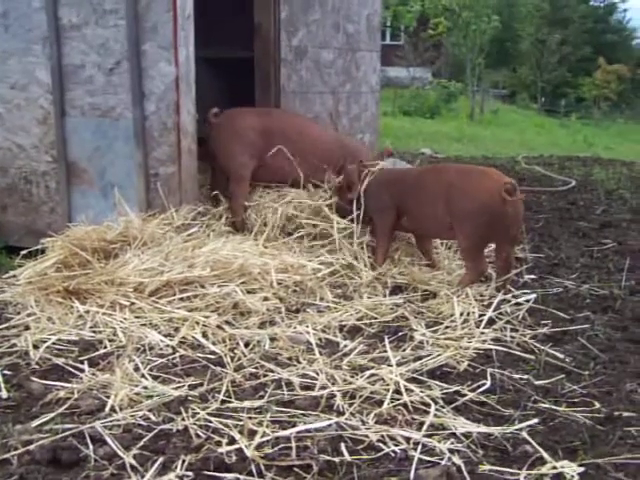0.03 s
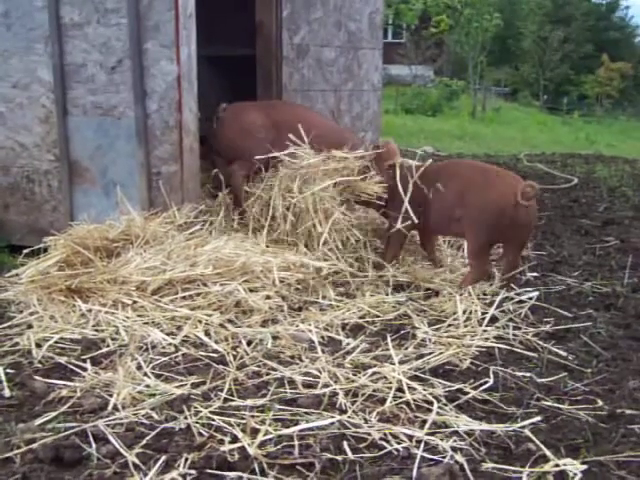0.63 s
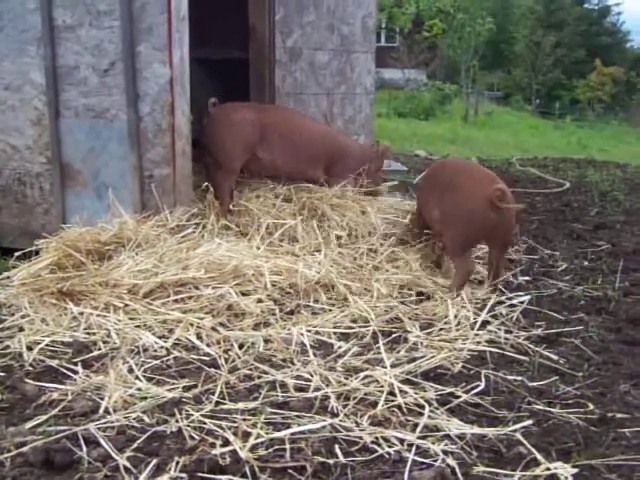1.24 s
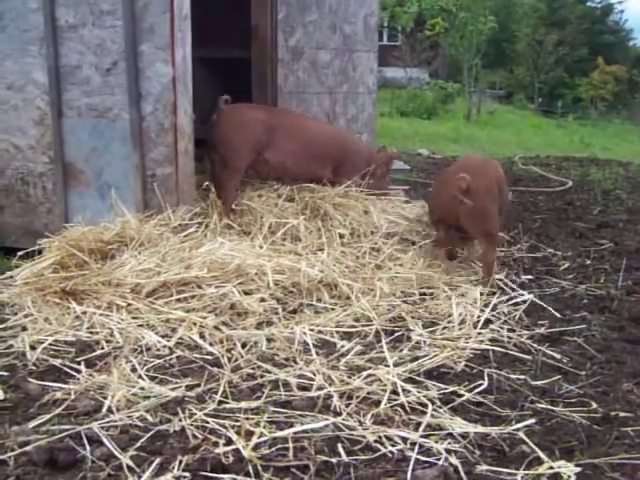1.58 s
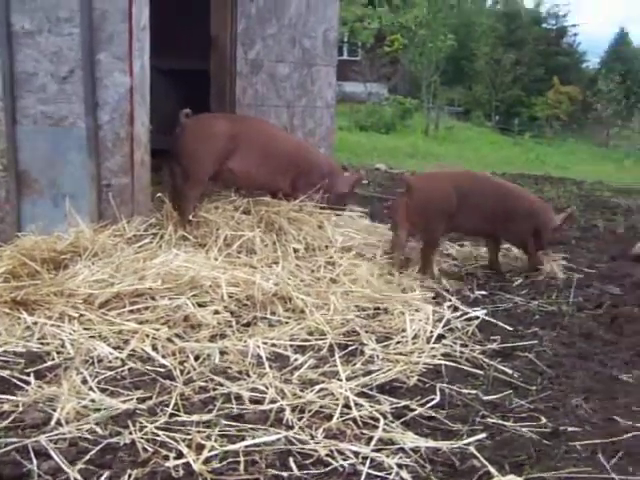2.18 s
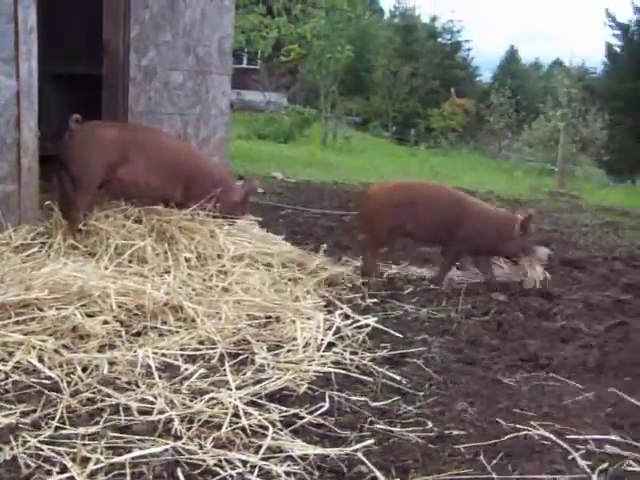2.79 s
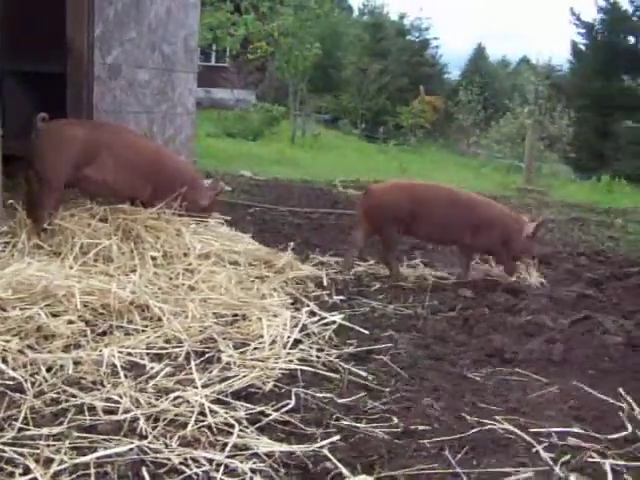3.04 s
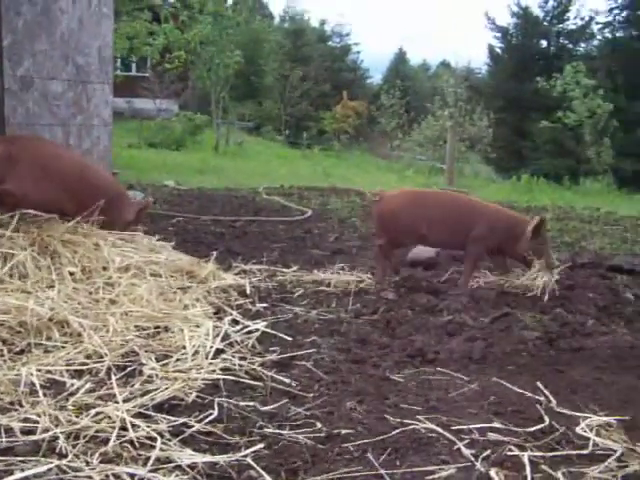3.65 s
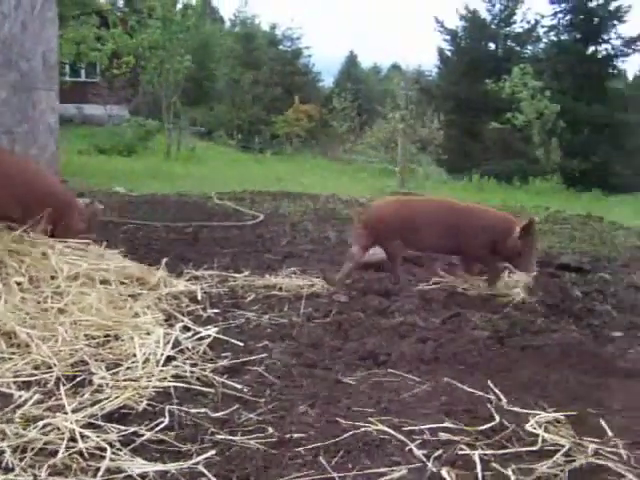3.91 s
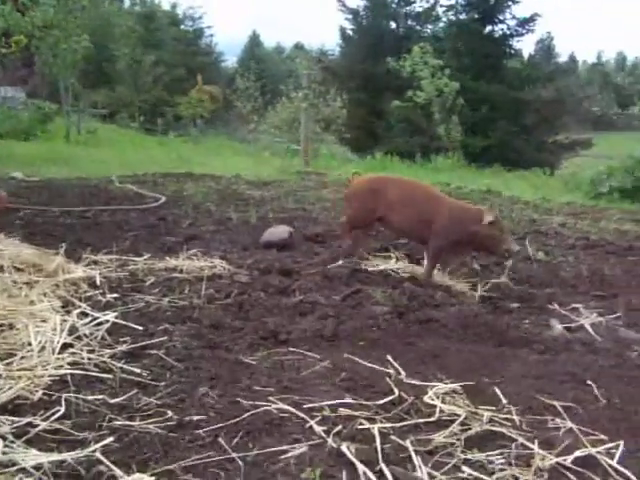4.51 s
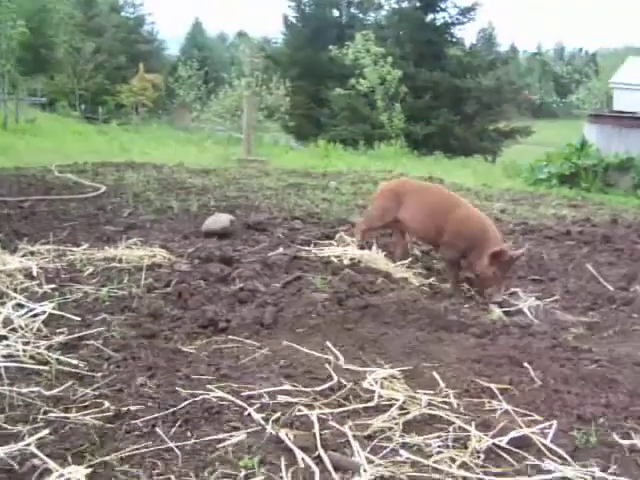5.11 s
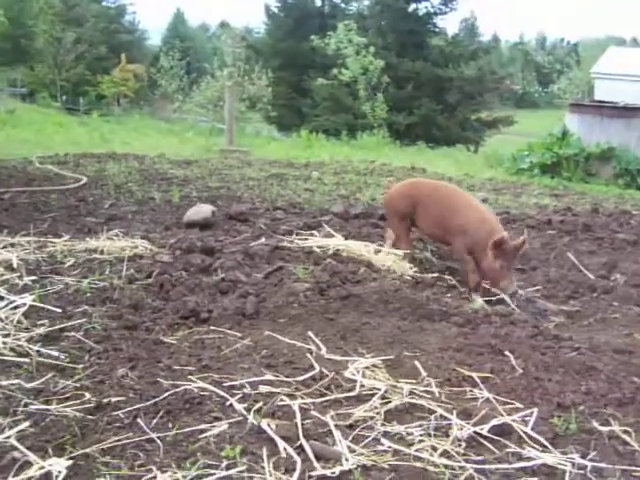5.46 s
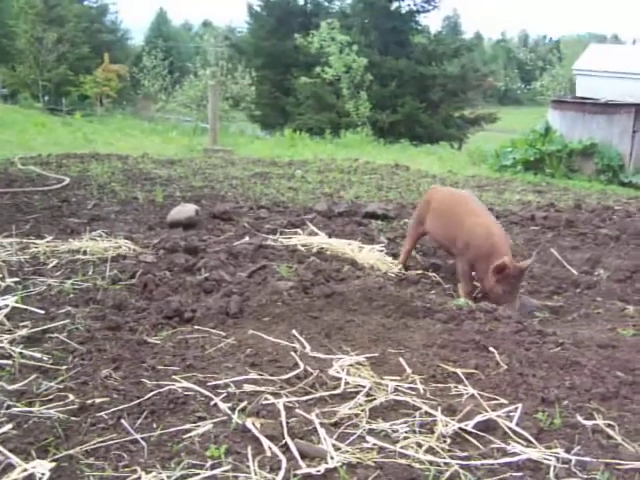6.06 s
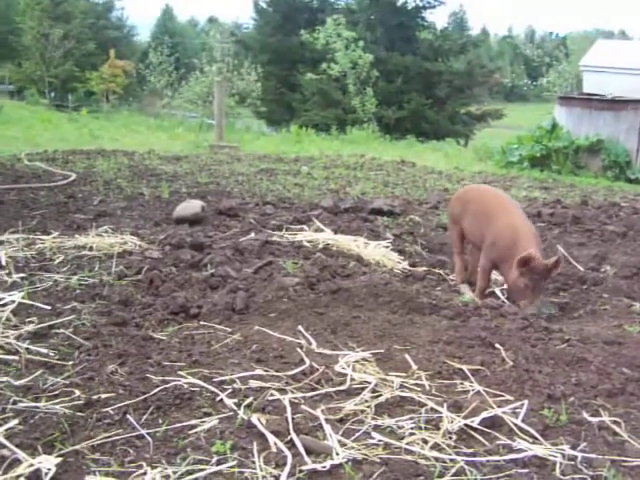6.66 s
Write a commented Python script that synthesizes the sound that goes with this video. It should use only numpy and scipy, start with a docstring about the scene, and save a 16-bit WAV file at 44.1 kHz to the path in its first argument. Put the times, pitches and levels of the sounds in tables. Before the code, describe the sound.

Crisp straw rustles in uneven bursts as young pigs shove through it, with sharp stalk cracks and quiet, breathy grunts. A swallow gives short, clear chirps overhead. About four seconds in, hooves knock on mud and clods; then the straw settles to light stirring while far birds call. A small microphone in the open farm pen also picks up steady airy hiss, a faint engine hum and its camera's slight whine.

```python
"""Two young pigs shove through dry straw in an outdoor pen; one trots off and snuffles in the soil.
The straw crackles with many tiny breaks, thick stalks snap, and hooves pat the mud. Each snuffle is
fluttering air that rings in the nose and mouth. A swallow whistles overhead and other birds call from
the trees. Behind it all are a soft hiss of open air, a far idling engine and a camera's faint whine,
and once a low drone swells and fades."""
import sys
import numpy as np
from scipy import signal
from scipy.fft import rfft, irfft, next_fast_len
from scipy.io import wavfile
from scipy.ndimage import uniform_filter1d

SR = 44100
rng = np.random.default_rng(int(sys.argv[2]) if len(sys.argv) > 2 else 0)


def inscribe(sig):
    """Save sig as 16-bit PCM at rate SR to the path in sys.argv[1].

    A 1-D sig is mono; a 2-D sig holds one channel per row.
    Samples are clipped to [-1, 1] before scaling.
    """
    pcm = np.round(np.clip(np.atleast_2d(sig).T, -1, 1) * 32767)
    wavfile.write(sys.argv[1], SR, pcm.astype(np.int16))


N = 299439
TIME = np.arange(N) / SR


def from_db(db):
    """Turn decibels into a number to multiply a sound by."""
    return 10 ** (np.asarray(db) / 20)


def unit_power(x):
    """Scale a sound so that its average power is 1."""
    return x / np.sqrt(np.mean(x ** 2) + 1e-20)


def curves(rows):
    """Join timed rows with straight lines: one curve for each column after the time."""
    times, *columns = np.transpose(rows)
    return [np.interp(TIME, times, column) for column in columns]


def drift(rate):
    """A smooth random wobble about 1 in size; a higher rate wobbles faster."""
    r = np.exp(-40 * np.pi * rate / SR)
    slow = signal.lfilter([1], [1, -2 * r, r * r], rng.standard_normal(N // 20 + 2002))[2000:]
    return np.interp(np.arange(N) / 20, np.arange(len(slow)), unit_power(slow))


def colour(x, spectrum):
    """Make some frequencies stronger and others weaker, then set the power to 1."""
    hz, db = np.transpose(spectrum)
    size = next_fast_len(N)
    bins = np.maximum(np.fft.rfftfreq(size, 1 / SR), 1)
    gains = from_db(np.interp(np.log(bins), np.log(hz), db))
    return unit_power(irfft(rfft(x, size) * gains, size)[:N])


def ring(x, hz, width):
    """Let a sound ring around one frequency; filtering twice cuts the rest away steeply."""
    r = np.exp(-np.pi * width / SR)
    forward = np.array([1, 0, -1]) * (1 - r * r) / 2
    feedback = [1, -2 * r * np.cos(2 * np.pi * hz / SR), r * r]
    return signal.lfilter(forward, feedback, signal.lfilter(forward, feedback, x))


def band(x, hz, width):
    """The part of a sound around one frequency, with its power set to 1."""
    return unit_power(ring(x, hz, width))


def tone(hz):
    """A pure tone of power 1 that follows a pitch curve."""
    return np.sqrt(2) * np.sin(2 * np.pi * np.cumsum(hz) / SR)


def swell(start, length, skew):
    """A rounded rise and fall; a skew under 1 makes the top come earlier."""
    out = np.zeros(N)
    inside = (TIME > start) & (TIME < start + length)
    out[inside] = np.sin(np.pi * ((TIME[inside] - start) / length) ** skew)
    return out ** 0.46


def add(track, start, sound):
    """Mix a short sound into a track, with its start in seconds."""
    at = int(start * SR)
    track[at:at + len(sound)] += sound[:max(N - at, 0)]


def shove(top, length, rise_share=0.35, edge_db=-10.5):
    """The strength of one shove: the straw is pressed ever harder, then settles more slowly."""
    building = np.maximum(top - TIME, 0) / (rise_share * length)
    settling = np.maximum(TIME - top, 0) / ((1 - rise_share) * length)
    near = (building < 3) & (settling < 4)
    out = np.zeros(N)
    out[near] = from_db(edge_db * (building[near] ** 2 + settling[near] ** 1.4))
    return out


# A snout or leg shoves through the straw. Each row: time of the hardest push in seconds,
# level in dB, length in seconds, extra level for thick stalks in dB.
STRAW_SHOVES = [(0.02, -32, 0.4, 5.5), (0.197, -28, 0.084, 0.5), (0.441, -22.5, 0.23, 2),
                (0.658, -19.5, 0.27, -0.5), (0.885, -20, 0.39, 0), (1.087, -25.5, 0.15, 1),
                (1.252, -27, 0.2, -0.5), (1.669, -29, 0.15, 0.5), (1.8, -24.5, .27, -2.5),
                (2.056, -28, 0.2, -5.5), (2.337, -31, 0.051, -2), (2.481, -26.5, .28, -6),
                (2.814, -33, 0.085, -16), (2.925, -29.5, 0.15, -2), (3.36, -30, 0.18, 1),
                (3.527, -32.5, 0.27, 2), (3.702, -32.5, 0.14, -1), (3.825, -32.5, .16, 4),
                (4.066, -32.5, 0.37, -2), (4.245, -33, 0.11, 3), (4.615, -29.5, .32, 3.5),
                (5.108, -41, 0.24, 5), (5.379, -34, 0.16, -1), (5.558, -37.5, 0.048, 0),
                (5.844, -48.5, 0.42, 6), (6.1, -50.5, .2, 12), (6.319, -41.5, 0.25, 2),
                (6.761, -39, 0.53, 0.5)]
# Straw stirred underfoot between shoves. Each row: time in seconds, level in dB, an unused number.
STRAW_STIRRING = [(0, -37, 4), (1.3, -34.5, -3), (1.52, -36.5, -4), (2.15, -35.5, 3), (3.0, -37.5, 7),
                  (3.15, -39.5, 0), (3.4, -36.5, -1), (4.45, -36.5, 3), (4.9, -43.5, 5), (5.24, -49.5, 6),
                  (5.45, -45.5, 5), (6.0, -45, 8), (6.22, -59, 8), (6.79, -63, -5)]


def straw_movement(stirring_thick_db=2):
    """Stirring and shoves add up to set how loud the thin and the thick stalks are."""
    thin_power = from_db(curves(STRAW_STIRRING)[0]) ** 2
    thick_power = thin_power * from_db(stirring_thick_db) ** 2
    for top, db, length, thick_db in STRAW_SHOVES:
        power = (from_db(db) * shove(top, length)) ** 2
        thin_power += power
        thick_power += power * from_db(thick_db) ** 2
    return np.sqrt(thin_power), np.sqrt(thick_power)


def crackles(per_second, spread_db=1.5):
    """Tiny breaks click at random moments, a few louder than the rest."""
    sizes = from_db(spread_db * np.minimum(rng.exponential(1, N), 5))
    signs = rng.choice([-1, 1], N)
    breaking = rng.random(N) < per_second / SR
    return unit_power(sizes * signs * breaking / np.sqrt(per_second))


# The bright tone of dry straw. Each row: frequency in Hz, relative strength in dB.
STRAW_SPECTRUM = [(120, -39.5), (320, -19.5), (520, -32.5), (750, -19.5), (1050, -19), (1280, -21.5),
                  (1600, -16), (2050, -17), (2500, -8), (3300, -6), (4400, -1), (5500, -0.5), (6400, 0),
                  (7100, -3), (8000, -8), (9000, -20.5)]


def straw(thick_below_hz=4830):
    """Stalks rub and crack in clumps; harder shoving breaks more, and thick stalks sound lower."""
    thin_gain, thick_gain = straw_movement()
    breaks_per_second = 4000 * (thin_gain / from_db(-34)) ** 0.6
    fine = crackles(breaks_per_second) + 0.5 * rng.standard_normal(N)
    stiff_stalks = from_db(-12) * crackles(0.014 * breaks_per_second)
    clumps = from_db(0.89 * drift(25.6))
    rustle = colour((fine + stiff_stalks) * clumps, STRAW_SPECTRUM)
    keep_highs = signal.butter(2, thick_below_hz, "high", fs=SR, output="sos")
    thin = signal.sosfiltfilt(keep_highs, rustle)
    thick = rustle - thin
    return thin_gain * thin + thick_gain * thick


# Snuffling grunts. Each row: start in seconds, length in seconds, level in dB,
# ring of the nose in Hz, extra level for the mouth in dB (higher is more open).
PIG_SNUFFLES = [(0, 0.13, -50, 352, 7), (0.34, 0.19, -52, 326, -16), (1.056, 0.28, -49.5, 338, 0.5),
                (1.597, 0.34, -45, 323, 4), (2.451, 0.27, -46.5, 330, 4.5), (3.264, 0.28, -51, 313, 1.5),
                (3.8, 0.17, -50, 350, 1), (4.505, 0.36, -42, 302, -0.5), (4.872, 0.32, -53.5, 314, -1),
                (5.73, 0.061, -49.5, 340, 1), (6.254, 0.19, -42, 300, 0)]
# Where the mouth rings. Each row: frequency in Hz, width in Hz, relative level in dB.
MOUTH_RINGS = [(755, 376, -5), (1020, 310, -14.5)]


def snuffles():
    """Uneven flaps in a pig's snout chop the air, which rings in the nose and the half-open mouth."""
    flap_hz = 42 * from_db(2 * drift(17.8))
    breath = from_db(0.56 * tone(flap_hz)) * rng.standard_normal(N)
    nose, mouth_gain = np.zeros(N), np.zeros(N)
    for start, length, db, nose_hz, open_db in PIG_SNUFFLES:
        push = from_db(db) * swell(start, length, skew=0.5)
        nose += push * band(breath, nose_hz, width=177)
        mouth_gain += push * from_db(open_db)
    mouth = sum(from_db(db) * band(breath, hz, width) for hz, width, db in MOUTH_RINGS)
    return nose + mouth_gain * mouth


# The tone of the open air. Each row: frequency in Hz, relative strength in dB.
AIR_SPECTRUM = [(35, -45), (60, -1.5), (125, 1), (508, -5), (710, -7.5), (789, -5), (1250, -11.5),
                (1450, -10), (1860, -13), (3490, -3), (6540, -7.5), (7570, -13.5), (8950, -33),
                (11600, -73), (19700, -120)]


def open_air():
    """A soft, steady outdoor hiss."""
    return from_db(-47) * colour(rng.standard_normal(N), AIR_SPECTRUM)


# The engine's speed. Each row: time in seconds, firings per second.
ENGINE_SPEED = [(0, 50.43), (2.8, 51.23), (4.2, 49), (5.9, 48), (6.79, 49.7)]
# The tones in its hum. Each row: multiple of the firing rate, level in dB.
ENGINE_TONES = [(1, -60.5), (2, -62), (3, -66.5)]


def engine():
    """A far engine idles; its firings blend into a low, slightly unsteady hum."""
    firing_hz = curves(ENGINE_SPEED)[0] * (1 + 0.0056 * drift(2.2))
    return sum(from_db(db + 0.98 * drift(4)) * tone(k * firing_hz) for k, db in ENGINE_TONES)


# The tones in the camera's whine. Each row: pitch in Hz, level in dB.
WHINE_TONES = [(718, -62.5), (1436, -65.5)]


def camera_whine(waver_db=1.3):
    """Two faint tones that waver a little in level and pitch."""
    out = np.zeros(N)
    for hz, db in WHINE_TONES:
        gain = from_db(db + waver_db * drift(4.2))
        out += gain * tone(hz * (1 + 0.0023 * drift(12.5)))
    return out


# Hooves and snouts thump the ground.
# Each row: start in seconds, level in dB, pitch in Hz, seconds to fade by 60 dB.
GROUND_THUDS = [(0.166, -38.5, 350, 0.054), (0.732, -35.5, 275, 0.055), (.935, -38.5, 69, 0.27),
                (2.675, -43, 324, 0.11), (3.962, -30, 1137, 0.056), (4.0, -31.5, 656, 0.022),
                (4.039, -33.5, 222, 0.084), (4.104, -33.5, 790, 0.019), (5.405, -35.5, 234, 0.075),
                (5.417, -38, 850, 0.033), (5.485, -39, 1250, 0.022)]


def thuds():
    """Soft blows on mud and clods: mostly crumbling grit, with a note that dies quickly."""
    out, t = np.zeros(N), TIME[:SR // 2]
    for start, db, hz, fade_time in GROUND_THUDS:
        grit = band(rng.standard_normal(len(t)), hz, width=hz)
        note = 1.1 * np.sin(2 * np.pi * hz * t)
        rise_and_fade = (1 - np.exp(-t * hz)) * from_db(-60 * t / fade_time)
        add(out, start, from_db(db) * (grit + note) * rise_and_fade)
    return out


# Thick stalks snap. Each row: start in seconds, peak level in dB, ring in Hz.
STALK_SNAPS = [(0.734, -24, 1720), (1.2252, -16, 6040), (1.402, -16, 3700), (2.456, -12, 5200),
               (2.576, -11, 6000), (2.614, -7, 4130), (2.6237, -10.5, 3900), (2.925, -14.5, 4430),
               (3.9625, -20, 1170), (3.9628, -9, 2640), (3.964, -10, 4200), (4.367, -21, 6140),
               (5.268, -25.5, 3300), (5.6613, -21, 5940), (6.0306, -15, 5500), (6.032, -24.5, 2900),
               (6.759, -16, 5450), (6.779, -9.5, 5030)]


def snaps():
    """A stalk cracks and splinters; the ground throws the crack back about a millisecond later."""
    out, t = np.zeros(N), TIME[:1024]
    for start, db, hz in STALK_SNAPS:
        burst = 0.06 * rng.standard_normal(len(t)) * from_db(-60 * t / 0.009)  # splinters
        burst[0] += 1  # the break
        burst[int(rng.uniform(0.0006, 0.0012) * SR)] += 0.55  # its echo
        for width in (0.5 * hz, 0.58 * hz):  # two broad filters make the stalk ring
            r = np.exp(-np.pi * width / SR)
            burst = signal.lfilter([1, 0, -1], [1, -2 * r * np.cos(2 * np.pi * hz / SR), r * r], burst)
        add(out, start, from_db(db) * burst / np.abs(burst).max())
    return out


def whistle(shape, start, db, pitch=1):
    """One gliding, slightly unsteady bird note."""
    times, hz, shape_db = np.transpose(shape)
    t = TIME[:int(times[-1] * SR)]
    waver = 1 + 0.014 * unit_power(uniform_filter1d(rng.standard_normal(len(t)), size=90))
    gain = from_db(db + np.interp(t, times, shape_db))
    out = np.zeros(N)
    add(out, start, gain * tone(pitch * waver * np.interp(t, times, hz)))
    return out


# The shape of one swallow chirp. Each row: seconds into it, pitch in Hz, relative level in dB.
SWALLOW_SHAPE = [(0, 3846, -21), (.011, 5550, -4.5), (.021, 5480, -5.5), (.029, 4190, -3),
                 (.039, 3900, -9.5), (.046, 4164, 2), (.054, 3070, -22), (.073, 3600, -7), (.078, 4004, 0),
                 (.084, 4300, 1.5), (.089, 3396, -12), (.106, 3025, -21.5)]
# The swallow's chirps. Each row: start in seconds, level in dB, number to multiply the pitch by.
SWALLOW_CHIRPS = [(1.501, -24.5, 0.98), (2.385, -25, 0.96), (3.391, -23.5, 1.01), (5.493, -40.5, 0.92)]


def swallow(echo_seconds=0.0075, echo_db=-5):
    """A swallow repeats its chirp nearby, and the shed wall throws it back."""
    chirps = sum(whistle(SWALLOW_SHAPE, start, db, pitch) for start, db, pitch in SWALLOW_CHIRPS)
    return chirps + from_db(echo_db) * np.interp(TIME - echo_seconds, TIME, chirps)


# A passing low drone. Each row: time in seconds, pitch in Hz, level in dB.
DRONE_PATH = [(1.95, 55, -85), (2.04, 57.2, -54), (2.25, 66.7, -53), (2.46, 76.2, -54), (2.56, 78.7, -77)]


def drone():
    """A low tone swells, climbs in pitch and fades."""
    hz, db = curves(DRONE_PATH)
    return from_db(db + 2.5 * drift(12)) * tone(hz)


# Hoarse bird calls. Each row: start in seconds, length in seconds, level in dB,
# first pitch in Hz, last pitch in Hz, width in Hz (wider is rougher).
HOARSE_CALLS = [(2.828, 0.18, -44.5, 1375, 1480, 109), (4.769, 0.33, -44.5, 3840, 3130, 280),
                (5.769, .29, -43.5, 3936, 3650, 332), (6.415, 0.084, -55, 3950, 4070, 90)]


def hoarse_birds():
    """Far birds rasp: each call is a gliding tone roughened by a fast random wobble."""
    out = np.zeros(N)
    for start, length, db, first_hz, last_hz, width in HOARSE_CALLS:
        hz = np.interp(TIME, [start, start + length], [first_hz, last_hz])
        phase = 2 * np.pi * np.cumsum(hz) / SR
        rasp = drift(1.6 * width) * np.sin(phase) + drift(1.1 * width) * np.cos(phase)
        out += from_db(db) * swell(start, length, skew=0.93) * rasp
    return out


# The shape of one short bird note. Each row: seconds into it, pitch in Hz, relative level in dB.
CHIP_SHAPE = [(0, 3090, -1), (.016, 3330, -5), (.032, 3650, 1), (.043, 3250, 1), (.06, 3070, -11)]
# Those notes, heard from the trees. Each row: start in seconds, level in dB.
TREE_CHIPS = [(5.021, -40.5), (6.197, -46)]


def chipping_bird():
    """A far bird whistles short notes that rise and fall in pitch."""
    return sum(whistle(CHIP_SHAPE, start, db) for start, db in TREE_CHIPS)


def yard_echoes(x, fade_time):
    """Scattered echoes from the shed and the trees, fading by 60 dB in fade_time seconds."""
    t = TIME[:SR // 2]
    echoes = rng.standard_normal(len(t)) * from_db(-60 * t / fade_time)
    echoes *= (rng.random(len(t)) < 0.02) & (t > 0.008)  # keep only a few, none in the first 8 ms
    return signal.fftconvolve(x, echoes / np.sqrt(np.sum(echoes ** 2)))[:N]


def scene():
    """The pen with the countryside behind it, in one channel."""
    pigs = straw() + snuffles() + thuds() + snaps()
    background = open_air() + engine() + camera_whine() + drone()
    birds = swallow() + hoarse_birds() + chipping_bird()
    echoes = from_db(-14.5) * yard_echoes(birds, fade_time=0.42)
    return (pigs + background + birds + echoes)[None]


def record(dry):
    """A small camera softens the high sounds and cuts off the very highest."""
    soften = signal.butter(10, 7800, fs=SR, output="sos")
    cut_off = signal.ellip(10, 0.2, 80, 9100, fs=SR, output="sos")
    return signal.sosfilt(cut_off, signal.sosfilt(soften, dry))


dry = scene()
out = record(dry)
inscribe(out)
```